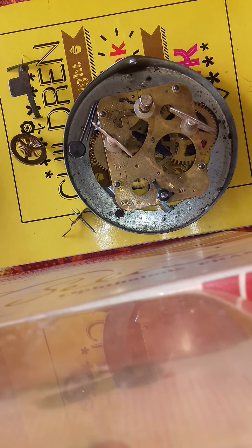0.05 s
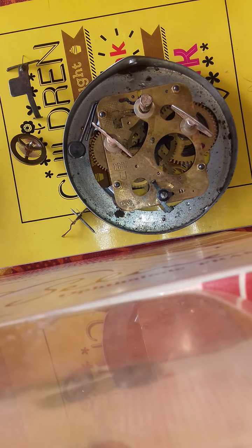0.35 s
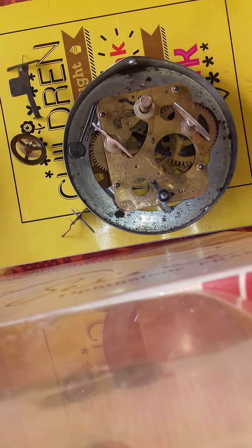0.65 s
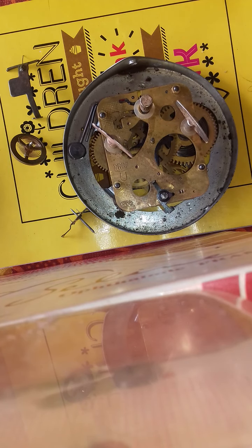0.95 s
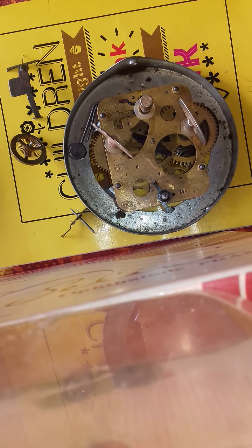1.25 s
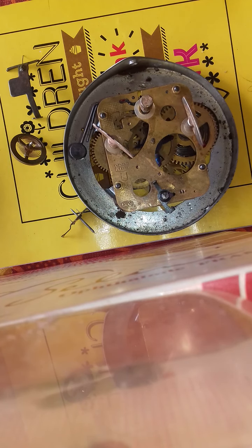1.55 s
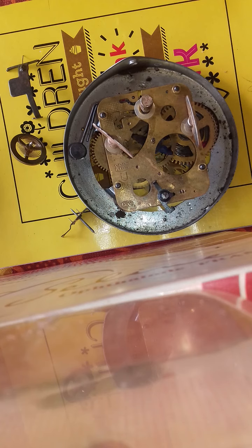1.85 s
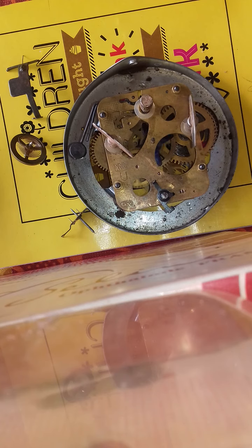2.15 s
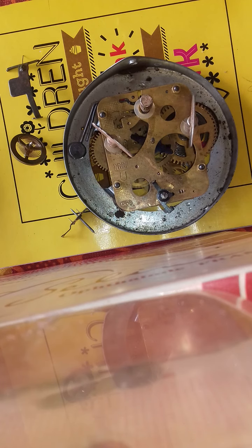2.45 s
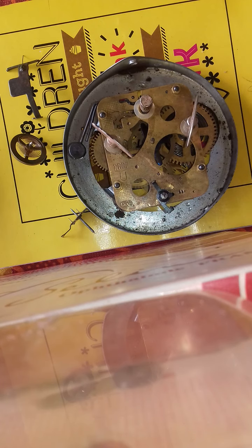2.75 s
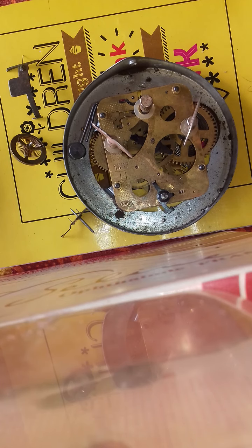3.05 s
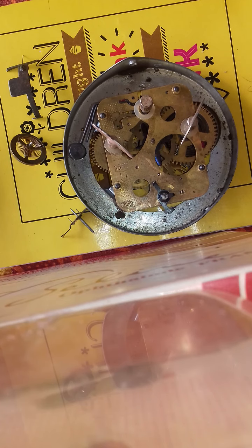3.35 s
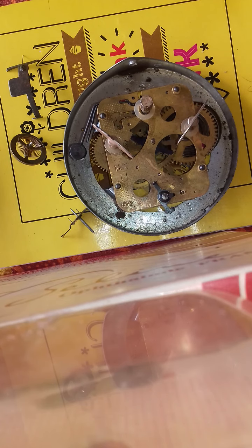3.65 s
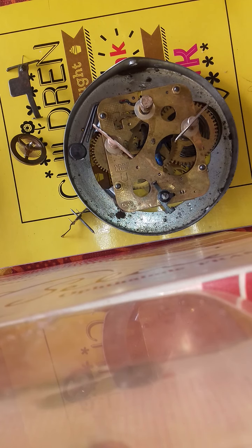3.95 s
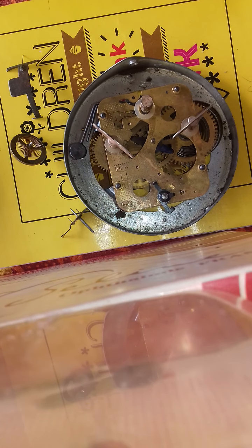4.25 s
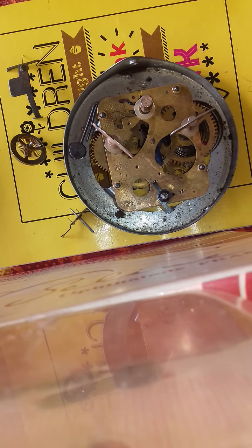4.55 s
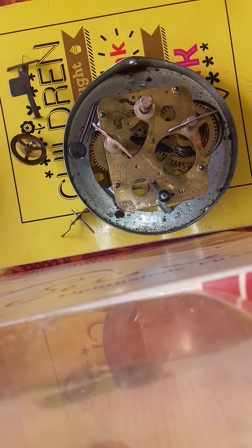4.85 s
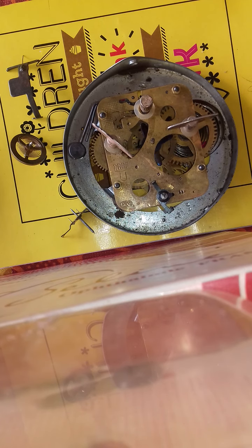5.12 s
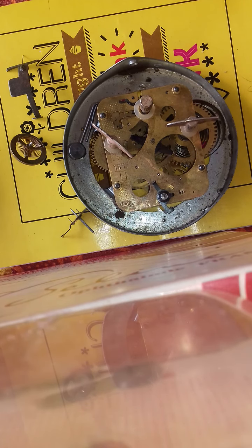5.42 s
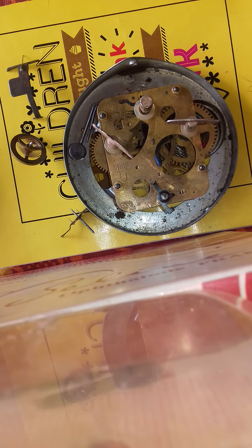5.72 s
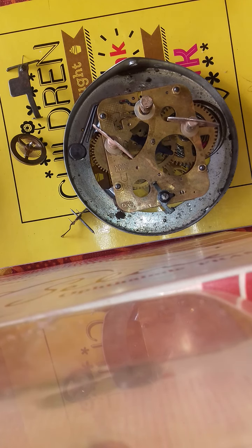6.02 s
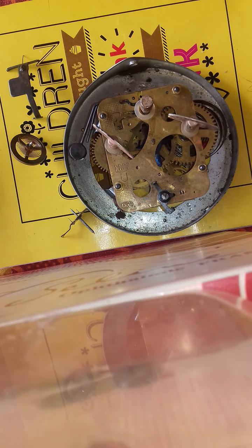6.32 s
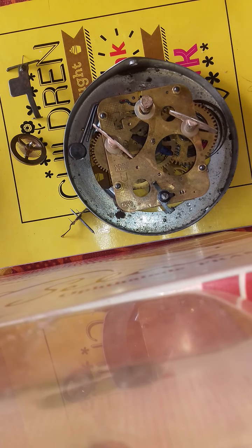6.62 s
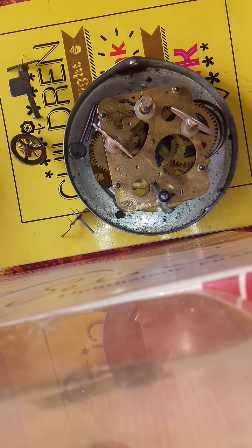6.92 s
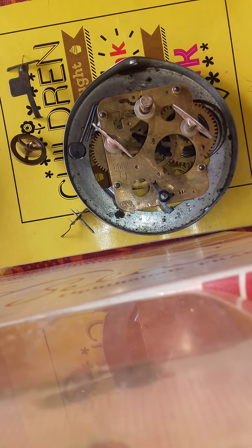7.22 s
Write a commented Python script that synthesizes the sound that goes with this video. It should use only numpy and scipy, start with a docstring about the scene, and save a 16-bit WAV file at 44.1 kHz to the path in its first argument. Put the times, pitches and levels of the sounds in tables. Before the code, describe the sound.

A brass clock movement runs down freely, its gears making a bright, ringing hiss with small irregular metal knocks and no ticking.

```python
"""A bright, ringing hiss with small metal knocks in it: a brass clock movement running down freely,
with no escapement to make it tick. Fast gear teeth rub, and the hiss rings in the plates and wheels,
changing colour as they turn. A loose arbor rattles and knocks, ringing the steel case.
Underneath are a faint wheel rub, a few soft, booming bumps and a quiet room. Close microphone."""
import sys
import numpy as np
from scipy import signal
from scipy.fft import rfft, irfft
from scipy.io import wavfile

SR = 44100
rng = np.random.default_rng(int(sys.argv[2]) if len(sys.argv) > 2 else 0)


def wav_record(signal):
    """Record a signal, one row per channel, as 16-bit PCM in the file named by sys.argv[1]."""
    frames = np.transpose(np.atleast_2d(signal))
    bounded = np.clip(frames, -1, 1)
    # unit amplitude maps onto the largest positive 16-bit level
    quanta = np.round(bounded * 32767).astype(np.int16)
    wavfile.write(sys.argv[1], SR, quanta)


N = 325458
TIME, HZ = np.arange(N) / SR, np.fft.rfftfreq(N, 1 / SR)
STEPS = TIME[::441]  # 10 ms grid for slow changes


def gain_of(db):
    """Decibels to gain."""
    return 10 ** (np.asarray(db) / 20)


def unit_rms(x):
    """Scales to rms 1."""
    return x / np.sqrt(np.mean(x ** 2) + 1e-20)


def colour(points):
    """An EQ curve through (pitch_hz, level_db) points."""
    hz, db = np.transpose(points)
    return gain_of(np.interp(np.log(HZ + 1), np.log(hz), db))


def ringing(modes):
    """Complex response of damped modes, each (pitch_hz, width_hz, level_db)."""
    return sum(gain_of(db) * 1j * HZ * width / (hz ** 2 - HZ ** 2 + 1j * HZ * width)
               for hz, width, db in modes)


def through(x, response):
    """Filters by a frequency response."""
    return irfft(rfft(x) * response, N)


def wander(t, per_s):
    """Random values joined by straight lines."""
    knots = rng.standard_normal(size=8000)
    return np.interp(t * per_s, np.arange(len(knots)), knots)


def follow(rows, t):
    """The value of a curve at the times t."""
    return np.interp(t, *np.transpose(rows))


def swell(middle_s, length_s):
    """A smooth rise and fall of height 1."""
    return np.exp(-(2 * (TIME - middle_s) / length_s) ** 2)


def impacts(per_s, spread_db):
    """Random clicks of either sign and uneven size."""
    size = gain_of(spread_db * np.minimum(rng.exponential(1, N), 4))
    return unit_rms(size * rng.choice([-1, 1], N) * (rng.random(N) < per_s / SR))


def add(mix, start_s, sound):
    """Mixes a sound in at start_s."""
    part = mix[max(round(start_s * SR), 0):][:len(sound)]
    part += sound[:len(part)]


# room tone, dark and soft: pitch_hz, level_db
ROOM_TONE = [(45, -34), (65, -4), (90, -0.5), (115, 6.5), (160, 7.5), (210, 12.5), (260, 7), (550, 5.5),
             (900, 0.5), (2000, -57), (8000, -42)]


def room(level_db=-59, spread=0.17):
    """Still air: a low wash, almost the same on both sides."""
    middle, side = (unit_rms(through(rng.standard_normal(N), colour(ROOM_TONE))) for _ in range(2))
    return gain_of(level_db) * np.array([middle + spread * side, middle - spread * side])


# faint swells of rubbing: middle_s, length_s, level_db
WHEEL_RUBS = [(2.2, 0.32, -64), (3.95, 0.55, -59.5), (5.8, 0.49, -58.5)]


def slow_wheel(pitch_hz=490, width_hz=90):
    """A slow wheel brushes the plate once a turn with a low rub."""
    envelope = sum(gain_of(db) * swell(s, length) for s, length, db in WHEEL_RUBS)
    band = ringing([(pitch_hz, width_hz, 0)]) ** 2
    return envelope * unit_rms(through(rng.standard_normal(N), band))


# soft, low thuds: start_s, peak_db
SOFT_BUMPS = [(2.727, -45), (2.835, -51), (2.894, -49.5)]


def soft_bumps(pitch_hz=210, rise_s=0.0099, t60_s=0.25):
    """Each soft bump swells into one low, booming ring of the room."""
    out, t = np.zeros(N), TIME[:SR // 2]
    attack = 1 - np.exp(-(t / rise_s) ** 2)
    ring = attack * gain_of(-60 * t / t60_s) * np.sin(2 * np.pi * pitch_hz * t)
    for start_s, db in SOFT_BUMPS:
        add(out, start_s, gain_of(db) * ring / abs(ring).max())
    return out


def case_rock(start_s=0.415, gain_db=-52, decay_s=0.05):
    """The case rocks once on the table with a dull tock."""
    burst, t = np.zeros(N), TIME[:SR // 4]
    add(burst, start_s, rng.standard_normal(len(t)) * np.exp(-t / decay_s))
    body = colour([(100, -20), (250, 3), (700, -1), (1200, -17), (2500, -40)])
    return gain_of(gain_db) * through(burst, unit_rms(body))


# the pulse of wheels running out of true: rate_hz, first_bind_s, swing_db
WHEEL_BINDS = [(1.81, .075, 1.07), (3.62, .117, 0.56), (5.0, 0.14, 0.84), (6.96, 0.029, 0.96)]
# slack moments where the rattle falls away: middle_s, length_s, load_db
SLACK_SPELLS = [(2.016, 0.04, -14), (4.29, 0.078, -6.5), (4.695, 0.052, -9), (4.85, 0.051, -5),
                (5.817, 0.46, -3.5)]


def train_load():
    """Load on the gear train in dB: up as each wheel binds once a turn, down when it runs slack."""
    binding = sum(db * np.cos(2 * np.pi * rate * (TIME - s)) for rate, s, db in WHEEL_BINDS)
    return binding + sum(db * swell(s, length) for s, length, db in SLACK_SPELLS)


# the midrange clank of the steel case: pitch_hz, width_hz, level_db
CASE_MODES = [(979.7, 23.3, 5.5), (1012, 33, 2.5), (1047.4, 44, 5.5), (1152, 130, -10.5), (1165, 42, -6)]
# accents, the arbor's hardest knocks: start_s, level_db (before knock_trim_db)
HARD_KNOCKS = [(0.0393, -31), (0.1894, -31.5), (0.2488, -30), (0.4174, -31), (0.5826, -35), (0.7168, -37),
               (1.1433, -34), (1.1742, -32), (1.3578, -34), (1.7684, -40), (1.7978, -32), (2.2827, -31),
               (2.387, -32), (2.4877, -35), (2.6499, -33), (2.7596, -34), (2.9731, -31), (3.048, -36),
               (3.1966, -34), (3.3603, -35), (3.4381, -34), (3.7349, -31), (3.9325, -32), (4.0253, -32),
               (4.1076, -30.5), (4.3116, -33.5), (4.7611, -30), (4.9706, -27), (5.0265, -29.5),
               (5.4635, -32), (5.5707, -31.5), (5.661, -32.5), (5.7563, -34), (5.913, -33), (6.135, -34.5),
               (6.1933, -30), (6.4817, -31), (6.7067, -30), (6.7306, -37), (6.9316, -34), (7.22, -31),
               (7.3352, -30)]


def loose_arbor(play, load_db, rattle_db=-47.5, play_db=3, knock_trim_db=-1.5, chatter_s=0.0045,
                tap_gap_s=0.032, tap_chance=0.5, tap_db=-39, tap_spread_db=4.0):
    """A loose arbor rings the case with a light rattle, taps and knocks, each blow a brief chatter."""
    # neighbouring modes move in opposite senses, so each ring swells before it dies
    case = ringing(CASE_MODES[::2]) - ringing(CASE_MODES[1::2])
    case *= colour([(600, -4), (930, 3.5), (1250, 8.5), (1500, -25)])
    clicks = impacts(per_s=600, spread_db=1.6) * gain_of(play_db * play)
    out = unit_rms(through(clicks, case)) * gain_of(rattle_db + load_db)
    blows = [(s, db + knock_trim_db) for s, db in HARD_KNOCKS]
    # passing teeth tap the arbor between knocks, harder under load
    for s in np.arange(0, TIME[-1], tap_gap_s):
        chance, late, size = rng.random(), rng.random(), rng.standard_normal()
        clear = all(abs(s - knock_s) > 0.6 * tap_gap_s for knock_s, _ in HARD_KNOCKS)
        if chance < tap_chance and clear:
            peak_db = tap_db + tap_spread_db * size + load_db[int(s * SR)]
            blows.append((s + 0.5 * late * tap_gap_s, peak_db))
    ring, t = irfft(case, N)[:SR // 10], TIME[:SR // 20]
    for start_s, peak_db in blows:
        chatter = rng.standard_normal(len(t)) * np.exp(-t / chatter_s)
        chatter[0] = 2 * np.linalg.norm(chatter)  # the first contact is the hardest
        knock = signal.fftconvolve(chatter, ring)
        add(out, start_s, gain_of(peak_db) * knock / abs(knock).max())
    return out


# tremolo from the turning shafts and meshing teeth: rate_hz, depth
SHAFT_THROBS = [(3.1, 0.03), (48.3, 0.057), (140.6, 0.039)]


def tooth_pressure(play, flicker_db=0.89, play_db=0.92):
    """Pressure between the teeth flickers and throbs with the shafts."""
    pressure = gain_of(flicker_db * wander(TIME, per_s=360) + play_db * play)
    turning_s = np.cumsum(1 + 0.006 * wander(TIME, per_s=2.84)) / SR  # the speed drifts slightly
    for rate_hz, depth in SHAFT_THROBS:
        pressure *= 1 + depth * np.sin(2 * np.pi * (rate_hz * turning_s + rng.random()))
    return unit_rms(pressure)


# the tone morphs as a wheel rides up on its pinion: time_s, ride (0 seated, 1 riding)
PINION_RIDE = [(0, 0.27), (4.6, 0.0069), (5.45, 0.091), (5.9, 0.88), (7.38, 1)]


def rubbed_brass(modes, drive, drift_per_s, drift_db=2.0):
    """Rubbed modes; each waxes and wanes as the contact travels over its nodes."""
    ride, out = np.clip(follow(PINION_RIDE, STEPS), 0, 1), np.zeros(N)
    for hz, width, seated_db, riding_db in modes:
        db = seated_db + ride * (riding_db - seated_db) + drift_db * wander(STEPS, drift_per_s)
        ring = signal.lfilter(*signal.iirpeak(hz, hz / width, fs=SR), drive * rng.standard_normal(N))
        share = np.pi * width / SR  # the part of the rubbing's power that a mode takes up
        out += ring * np.interp(TIME, STEPS, gain_of(db) / np.sqrt(share))
    return out


# the sheen of the plates: pitch_hz, width_hz, seated_db, riding_db
PLATE_MODES = [(5420, 360, -23.5, -7), (5427, 47, -6, -11.5), (5530, 50, -17, -24), (5760, 120, -10.5, -11),
               (6220, 110, -5.5, -17), (6290, 45, -5, -6.5), (6446, 59, -8.5, -4.5), (6540, 92, -11, -6.5),
               (6790, 190, -6.5, -19)]
# fader moves for the plates: time_s, level_db
PLATE_FADER = [(0.0, -29), (0.08, -35.5), (1.39, -33.5), (1.45, -35), (2.02, -36), (2.08, -34.5),
               (3.51, -36), (5.44, -35.5), (5.65, -30.5), (6.25, -37), (6.49, -33.0), (6.63, -36.5),
               (7.06, -33.0), (7.38, -36.5)]
# flares where a wheel's rim scrapes a plate: middle_s, length_s, boost_db
RIM_SCRAPES = [(1.172, .12, 2.5), (3.96, .06, 2.5), (5.77, 0.043, 3.5), (5.9, .05, 3)]


def plates(pressure, load_db, load_share=0.38, trim_db=-0.3):
    """The rubbing teeth ring the two brass plates, louder under load and at each scrape."""
    flare_db = sum(db * swell(s, length) for s, length, db in RIM_SCRAPES)
    level_db = follow(PLATE_FADER, TIME) + load_share * load_db + flare_db + trim_db
    return rubbed_brass(PLATE_MODES, pressure * gain_of(level_db), drift_per_s=8)


# fader moves for the hiss and the small parts: time_s, level_db
HISS_FADER = [(0.0, -29.5), (0.16, -32.5), (1.27, -33), (1.33, -35.0), (1.49, -31.5), (3.02, -30.5),
              (3.15, -32.0), (5.61, -31.5), (5.67, -31), (5.81, -32.0), (7.08, -32.5), (7.38, -33.0)]
# EQ of the tooth contacts, brightest at 7-8 kHz: pitch_hz, level_db
TOOTH_EQ = [(100, -51), (500, -26), (1400, -23.5), (2700, -24.5), (3500, -27), (5000, -18), (6000, -20.5),
            (7300, -4), (8100, -4.5), (8900, -8.5), (9700, -15.5), (11400, -23.5), (15600, -17.5)]
# shimmer of pinions, springs and small wheels: pitch_hz, width_hz, seated_db, riding_db
SMALL_MODES = [(1492, 22, -30.5, -37), (1585, 11, -33.5, -34.5), (1841, 25, -29, -47),
               (1993, 22, -32.5, -41), (2831, 4.4, -30, -27), (3054, 9.5, -33, -24.5),
               (3233, 30, -34.5, -26), (3333, 15, -28, -26), (3646, 40, -22, -25), (3797, 38, -27.5, -23),
               (4042, 23, -25, -22.5), (4400, 19, -21.5, -22), (4523, 80, -21, -27), (4688, 13, -21.5, -20),
               (8190, 41, -12.5, -17), (8424, 260, -15.5, -5.5), (8640, 38, -13, -15),
               (9100, 194, -9.5, -23), (9340, 220, -8.5, -7.5), (9510, 92, -14, -18),
               (9610, 38, -16.5, -14), (9875, 220, -6.5, -8), (9940, 92, -24, -20), (10300, 133, -14, -10),
               (10580, 42, -15.5, -18), (10700, 610, -11, -12), (11530, 23, -20.5, -20),
               (11920, 78, -24, -20), (12340, 325, -19, -17), (13263, 114, -29.5, -22),
               (14100, 238, -20, -16), (14035, 22, -24, -23)]


def gear_teeth(pressure, load_db, load_share=0.21, grit=0.53, hiss_trim_db=-1.0, ring_trim_db=-0.17):
    """Teeth slide and strike, making a gritty hiss and ringing the small parts."""
    level_db = follow(HISS_FADER, TIME) + load_share * load_db
    contact = pressure * (grit * impacts(per_s=5000, spread_db=3.5) + rng.standard_normal(N))
    hiss = gain_of(level_db + hiss_trim_db) * unit_rms(through(contact, colour(TOOTH_EQ)))
    drive = pressure * gain_of(level_db + ring_trim_db)
    return hiss + rubbed_brass(SMALL_MODES, drive, drift_per_s=3.07)


# the bright ring of the fastest wheel: pitch_hz, width_hz, seated_db, riding_db
WHEEL_MODES = [(6954, 89, -14.5, -7.5), (7090, 30, -21, -18), (7175, 54, -14, -12), (7267, 49, -9, -14),
               (7340, 34, -7, -8), (7420, 54, -13.5, -19), (7500, 56, -9.5, -10), (7540, 39, -11.5, -7),
               (7660, 75, -18, -8), (7640, 39, -13, -8.5), (7750, 38, -10.5, -12.5), (8100, 18, -21, -25)]
# fader moves for that wheel: time_s, level_db
WHEEL_FADER = [(0.0, -29.0), (1.39, -31), (1.53, -28), (1.69, -30.5), (2.52, -28.5), (2.94, -30.5),
               (3.0, -27.5), (4.0, -30.0), (5.67, -26.5), (5.87, -27.5), (5.93, -25.5), (6.64, -29.5),
               (6.96, -27.5), (7.38, -30.0)]


def fast_wheel(pressure, load_db, load_share=0.078, trim_db=0.1):
    """The fastest wheel sings in a tight cluster of high modes as its teeth rub."""
    level_db = follow(WHEEL_FADER, TIME) + load_share * load_db + trim_db
    return rubbed_brass(WHEEL_MODES, pressure * gain_of(level_db), drift_per_s=6)


def scene():
    """The running movement on its table; one tooth pressure drives the hiss and all the ringing brass."""
    play = wander(TIME, per_s=70)  # the arbors wobble in their worn bearings
    load_db = train_load()
    pressure = tooth_pressure(play)
    gears = gear_teeth(pressure, load_db) + plates(pressure, load_db) + fast_wheel(pressure, load_db)
    return gears + slow_wheel() + soft_bumps() + room() + loose_arbor(play, load_db) + case_rock()


def record(dry, top_hz=15780):
    """A notch in the left microphone port tips 8 kHz to the right; then a bass lift and a low-pass."""
    notch = 1 - ringing([(8020, 1200, -4.9)])
    ports = np.array([notch, np.ones(len(HZ))]) * 2 / (1 + notch)
    bass_lift = colour([(45, 8), (100, 0)])
    low_pass = signal.firwin(1023, top_hz, window=("kaiser", 9), fs=SR)
    return signal.oaconvolve(through(dry, ports * bass_lift), low_pass[None], "same")


dry = scene()
out = record(dry)
wav_record(out)
```